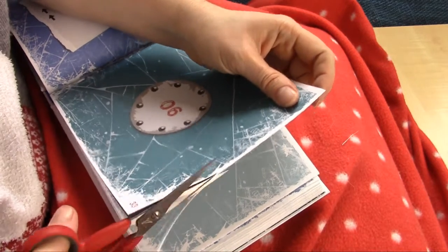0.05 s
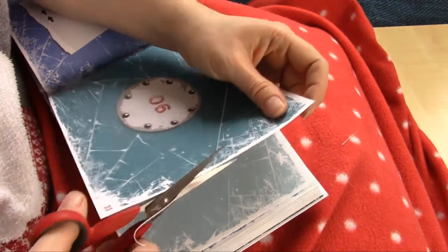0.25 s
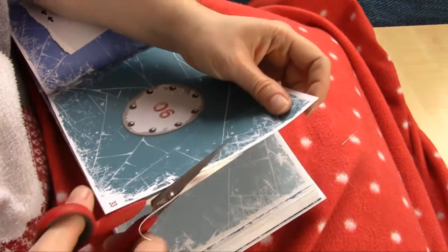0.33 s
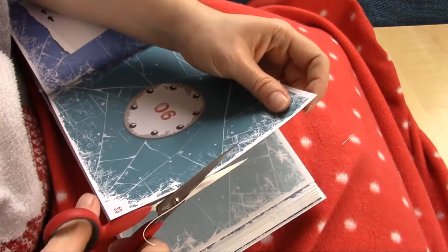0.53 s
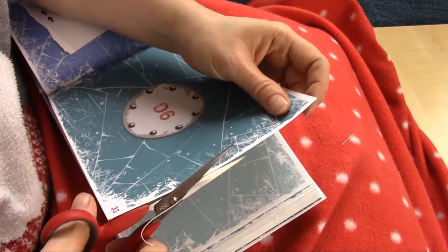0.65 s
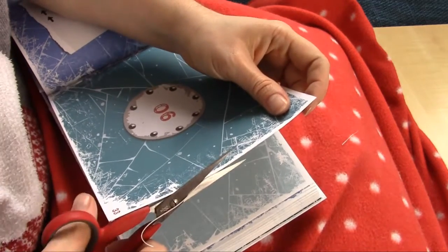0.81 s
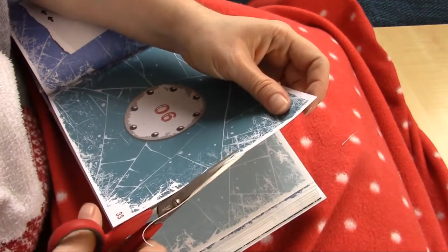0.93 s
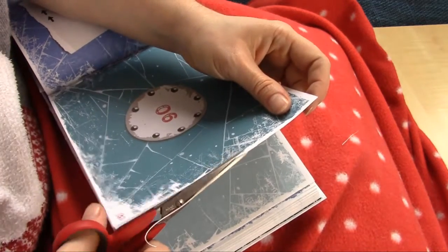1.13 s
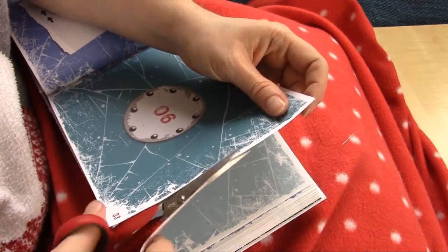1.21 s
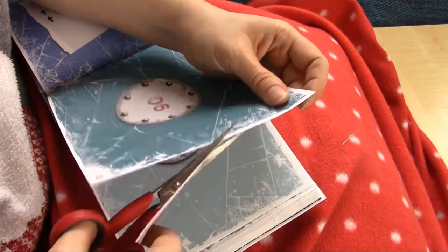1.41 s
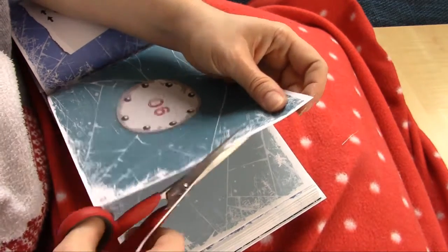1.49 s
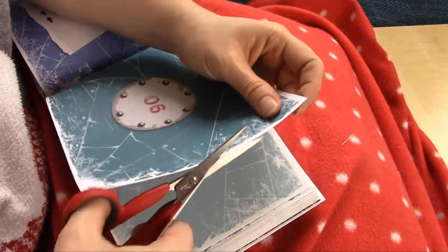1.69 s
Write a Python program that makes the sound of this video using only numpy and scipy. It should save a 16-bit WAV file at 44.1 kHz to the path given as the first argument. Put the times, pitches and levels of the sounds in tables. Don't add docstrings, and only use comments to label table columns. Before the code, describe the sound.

Metal blades hiss and scrape on thick paper, the sheet snaps sharply early on, then after a near pause come stuttering tearing bites and lighter snips, recorded close in a small quiet room with faint hiss.

```python
import sys
import numpy as np
from scipy import signal
from scipy.fft import rfft, irfft, next_fast_len
from scipy.io import wavfile
from scipy.ndimage import map_coordinates

SR = 44100
rng = np.random.default_rng(int(sys.argv[2]) if len(sys.argv) > 2 else 0)


def level_to_linear(level):
    exponent = np.asarray(level, float) / 20
    return 10 ** exponent


def waveform_to_disk(signal):
    frames = np.transpose(np.atleast_2d(signal))
    scaled = np.clip(frames, -1, 1) * 32767
    samples = np.round(scaled).astype(np.int16)
    wavfile.write(sys.argv[1], SR, samples)


N = 77175
T = np.arange(N) / SR

# (pitch_hz, width_hz, level_db)
PAGE_TONES = [(138, 67, -11), (211, 75, -7), (336.4, 104, -1), (460, 77.6, 1.5), (778, 210, -6.5)]


def unit(x):
    return x / np.sqrt(np.mean(x ** 2) + 1e-20)


def along(points, hz):
    point_hz, values = np.transpose(points)
    return np.interp(np.log(hz + 1), np.log(point_hz + 1), values)


def wobble(knots_per_s):
    knots = rng.standard_normal(int(N * knots_per_s / SR) + 4)
    return map_coordinates(knots, [T * knots_per_s])


def filtered(x, response):
    size = next_fast_len(N + SR // 4)
    gain = response(np.fft.rfftfreq(size, 1 / SR))
    gain = unit(np.abs(gain)) * np.exp(1j * np.angle(gain))
    return irfft(rfft(x, size) * gain, size)[..., :N]


def ringing(x, peaks):
    def response(hz):
        total = 0
        for k, (center, width, db) in enumerate(peaks):
            peak = 1j * hz * width / (center * center - hz * hz + 1j * hz * width)
            total = total + (-1) ** k * level_to_linear(db) * peak
        return total
    return filtered(x, response)


def air():
    # (pitch_hz, level_db per Hz)
    air_color = [(15, -49), (25, -18.5), (352, -2), (792, -7.5), (931, -4), (1120, -10), (2090, -13),
                 (11200, -28.5), (15800, -51)]
    # (pitch_hz, likeness from 0 to 1)
    likeness = [(60, 0.078), (240, 0.074), (950, 0.64), (3770, 0.75), (15000, 1)]

    def mid_and_side(hz):
        turn = np.arccos(np.clip(along(likeness, hz), -1, 1)) / 2
        return level_to_linear(along(air_color, hz)) * [np.cos(turn), np.sin(turn)]

    mid, side = filtered(rng.standard_normal((2, N)), mid_and_side)
    tone = unit(np.array([mid + side, mid - side]))
    whine = ringing(rng.standard_normal(N), [(11100, 100, 0)])
    return level_to_linear(-63.5 + 1.7 * wobble(7.3)) * tone + level_to_linear(-87) * whine


def fibres():
    spread_db = 4
    signs = np.sign(rng.standard_normal(N))
    return unit(signs * level_to_linear(spread_db * rng.standard_normal(N)))


def rub(force, hiss, page_db, high_tones):
    # (pitch_hz, width_hz, level_db)
    blade_body = [(1052, 182, -3), (1580, 294, 1.5), (2642, 368, 5), (3480, 550, 0), (4224, 490, -8.5)]
    body = ringing(force * fibres(), blade_body)
    treble = ringing(hiss * fibres(), high_tones)
    page = ringing(force * fibres(), PAGE_TONES)
    return body + treble + level_to_linear(page_db) * page


def slides():
    # (start_s, length_s, first_level_db, last_level_db, hiss_over_body_db)
    slide_moves = [(-.01, 0.034, -35, -57.5, -8), (0.027, 0.086, -54.5, -70.5, -12),
                   (0.116, 0.043, -55, -47, -9.5), (0.168, 0.039, -42, -47, -18),
                   (0.186, 0.073, -58, -50.5, -10), (0.277, 0.049, -60.5, -52, 1),
                   (0.313, 0.061, -43.5, -48, -7), (0.386, 0.046, -50, -65.5, -16),
                   (0.43, 0.044, -52.5, -55, -11), (0.486, 0.055, -70, -66, -11),
                   (0.601, 0.12, -67.5, -69, -11), (0.908, 0.043, -54, -46, -16.5),
                   (0.961, 0.14, -41, -53, -16.5), (1.113, 0.073, -60, -65, -14),
                   (1.219, 0.057, -51.5, -43, -8.5), (1.3, 0.11, -63, -62, -14),
                   (1.415, 0.086, -44, -56.5, -16), (1.491, 0.016, -57, -56, -9),
                   (1.524, 0.043, -53.5, -41.5, -11.5), (1.571, 0.06, -41.5, -46.5, -11),
                   (1.634, 0.061, -55, -57, -10.5), (1.687, .08, -52, -53.5, -5)]
    # (pitch_hz, width_hz, level_db)
    slide_hiss = [(4940, 910, 0.5), (7250, 900, 4.5), (10150, 2800, -8), (13500, 3000, -13.5)]
    attack_s, release_s, rough_db, page_db = 0.0052, 0.006, 1, -16.5
    force_power, hiss_power = np.zeros(N), np.zeros(N)
    for start, length, first_db, last_db, hiss_db in slide_moves:
        since = T - start
        fade_in = np.clip(since / attack_s, 0, 1)
        fade_out = np.exp(-np.clip(since - length, 0, 1) / release_s)
        level_db = first_db + (last_db - first_db) * np.clip(since / length, 0, 1)
        shape = fade_in * fade_out * level_to_linear(level_db)
        force_power += shape ** 2
        hiss_power += (level_to_linear(hiss_db) * shape) ** 2
    uneven = level_to_linear(rough_db * wobble(130))
    return rub(np.sqrt(force_power) * uneven, np.sqrt(hiss_power) * uneven, page_db, slide_hiss)


def snaps():
    # (start_s, crack_db, ring_db, thud_db)
    snap_events = [(0.049, -53.5, -50, -74), (0.1558, -31.5, -50.5, -57), (0.185, -36, -53, -43.5),
                   (0.192, -50, -47, -56), (0.2, -35.5, -33, -41.5), (0.217, -59, -62, -46),
                   (.264, -22.5, -16, -26), (.399, -57, -70, -64), (.44, -68, -66, -61),
                   (0.565, -70, -65, -85), (0.649, -53.5, -61.5, -75), (.68, -75, -61, -75),
                   (0.715, -55.5, -67, -83), (.743, -73, -58.5, -69), (0.784, -80, -63.5, -88),
                   (0.885, -71, -69, -74), (1.272, -35.5, -51, -44.5), (1.396, -47.5, -46, -51),
                   (1.461, -36.5, -28, -35), (1.477, -50, -42.5, -45), (1.536, -54, -60.5, -48),
                   (1.61, -40, -59, -68), (1.689, -44, -60, -56)]
    # (pitch_hz, level_db)
    crack_color = [(1500, -12), (3000, -1.5), (5500, -2), (8000, -1), (11000, -10), (15000, -31)]
    # (pitch_hz, width_hz, level_db)
    sheet_tones = [(1018, 43, -2.5), (1178, 39, -4.5), (1323, 86, -2), (1607, 180, -2.5), (2070, 125, -7),
                   (2437, 176, -6.5), (3280, 880, -19)]
    lag_s, ring_hold_s = 0.0013, 0.0038
    crack_t60_s, ring_t60_s, thud_t60_s = 0.011, 0.02, 0.038
    crack, ring, thud = np.zeros((3, N))
    for start, crack_db, ring_db, thud_db in snap_events:
        since = np.clip(T - start, 0, 1)
        late = np.clip(T - start - lag_s, 0, 1)
        rise = np.clip(since / lag_s, 0, 1) ** 2
        crack += (T >= start) * level_to_linear(crack_db - 60 * since / crack_t60_s)
        ring += rise * level_to_linear(ring_db - 60 * np.clip(late - ring_hold_s, 0, 1) / ring_t60_s)
        thud += rise * level_to_linear(thud_db - 60 * late / thud_t60_s)
    noise = rng.standard_normal((3, N))
    bright = crack * filtered(noise[0], lambda hz: level_to_linear(along(crack_color, hz)))
    return bright + ringing(ring * noise[1], sheet_tones) + ringing(thud * noise[2], PAGE_TONES)


def bites():
    # (start_s, length_s, level_db, hiss_over_body_db)
    bite_events = [(.131, 0.0047, -46, -9), (0.176, 0.0078, -53, 4), (0.221, 0.0013, -35.5, -14),
                   (.2015, 0.0051, -30, -25), (.916, 0.0049, -42.5, -14), (0.934, 0.01, -44, -12.5),
                   (0.959, 0.025, -40, -11), (0.989, 0.011, -36.5, -14), (1.001, 0.011, -36.5, -11),
                   (1.02, 0.014, -31.5, -18), (1.034, 0.014, -32.5, -18), (1.048, .012, -39.5, -15),
                   (1.065, 0.0071, -25, -19.5), (1.088, 0.0049, -55, -24), (1.0981, 0.0037, -33.5, -18),
                   (1.1012, 0.0047, -26.5, -19.5), (1.339, 0.0094, -53, -12.5), (1.421, 0.0078, -49, -3),
                   (1.457, 0.0078, -50, -12), (1.47, 0.0075, -35.5, -6.5)]
    # (pitch_hz, width_hz, level_db)
    steel_tones = [(4980, 520, 3), (7100, 810, 3), (9700, 1640, -6), (12260, 250, -4), (12840, 250, -6.5),
                   (14500, 1900, -13.5)]
    edge, page_db = 0.95, -22
    force, hiss = np.zeros(N), np.zeros(N)
    for start, length, level_db, hiss_db in bite_events:
        swell = np.sin(np.pi * np.clip((T - start) / length, 0, 1)).clip(0) ** edge
        shape = level_to_linear(level_db) * swell * (T > start) * (T < start + length)
        force += shape
        hiss += level_to_linear(hiss_db) * shape
    return rub(force, hiss, page_db, steel_tones)


def ports(x):
    # (pitch_hz, level_db)
    port_color = [(300, -36), (2000, -27.5), (6000, -25.5), (14000, -19.5)]
    smear = rng.standard_normal(400) * np.exp(-T[:400] / 0.0014)
    smeared = signal.fftconvolve(x, smear / np.linalg.norm(smear))[:N]
    side = filtered(smeared, lambda hz: level_to_linear(along(port_color, hz)))
    return level_to_linear(-24) * np.array([side, -side])


def room(x):
    # (pitch_hz, time_to_fade_60_db_s)
    room_fade = [(200, 0.36), (1500, 0.19), (5000, 0.13), (12000, 0.15)]
    level_db, side_db = -14.5, -19.5
    hz, t, noise = signal.stft(rng.standard_normal((2, SR // 3)), SR, nperseg=256)
    fade = level_to_linear(-60 * t / along(room_fade, hz)[:, None])
    tail = signal.istft(noise * fade, SR, nperseg=256)[1]
    tail = tail / np.linalg.norm(tail[0])
    delayed = np.pad(x, (200, 0))
    mid, side = signal.fftconvolve(delayed[None], tail, axes=1)[:, :N]
    return level_to_linear(level_db) * (mid + level_to_linear(side_db) * np.array([side, -side]))


def scene():
    background = air()
    near = slides() + snaps() + bites()
    pan = level_to_linear([[0.25], [-0.25]])
    return near * pan + ports(near) + room(near) + background


def band_limit(x):
    return signal.sosfilt(signal.butter(12, 15990, fs=SR, output="sos"), x)


def record(dry):
    return band_limit(dry)


dry = scene()
out = record(dry)
waveform_to_disk(out)
```